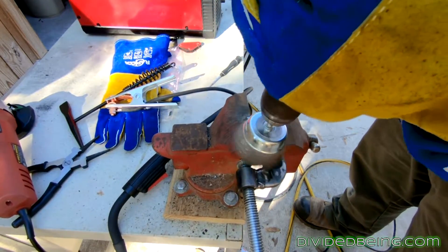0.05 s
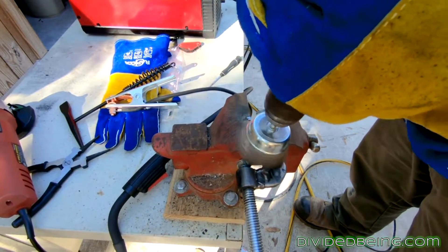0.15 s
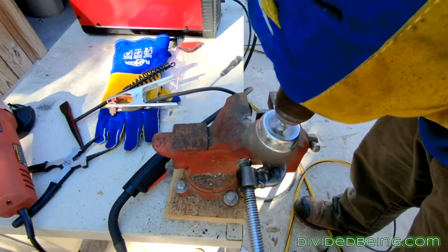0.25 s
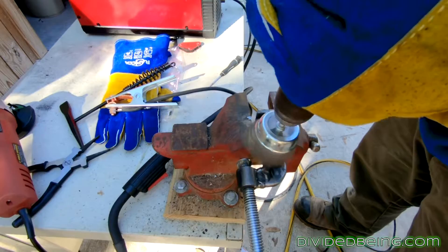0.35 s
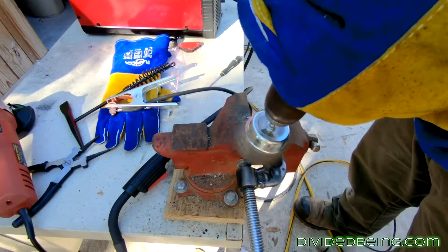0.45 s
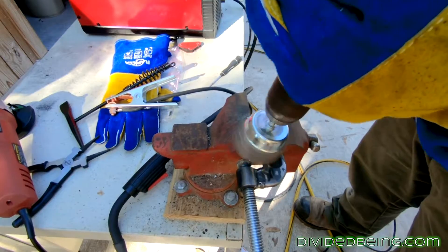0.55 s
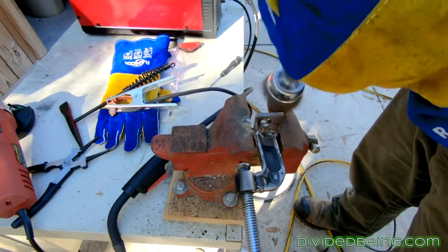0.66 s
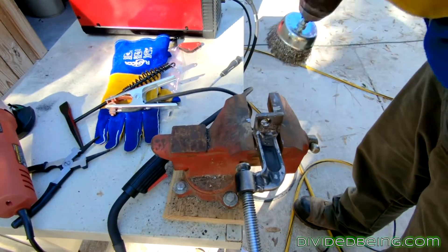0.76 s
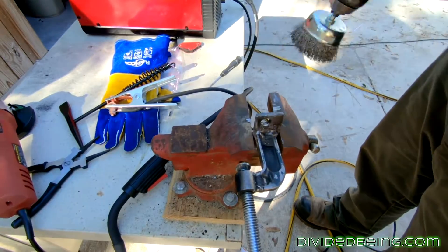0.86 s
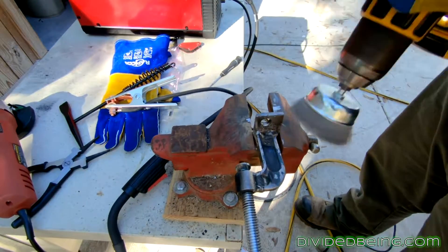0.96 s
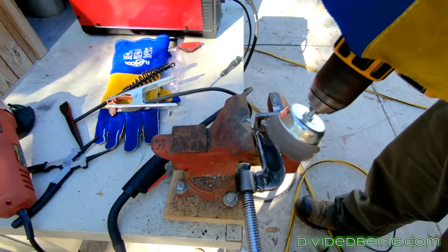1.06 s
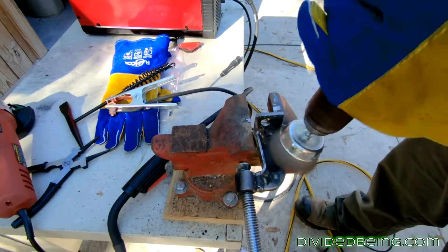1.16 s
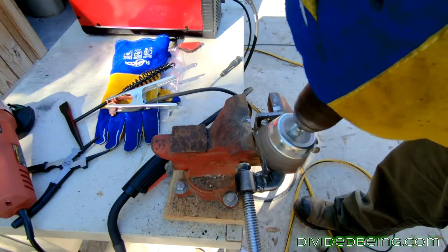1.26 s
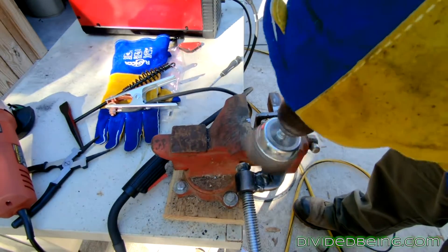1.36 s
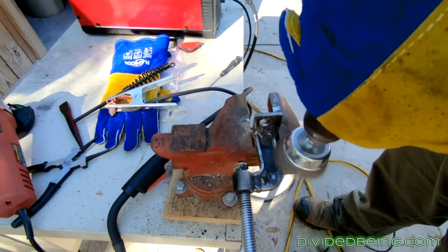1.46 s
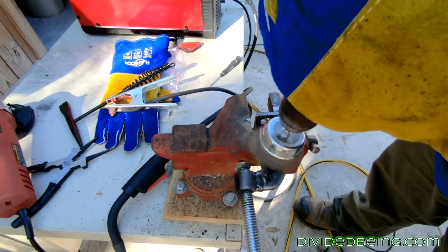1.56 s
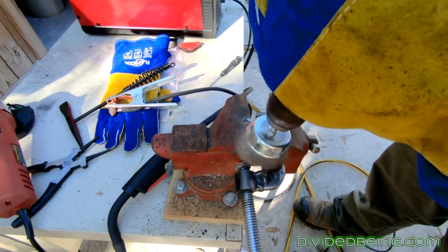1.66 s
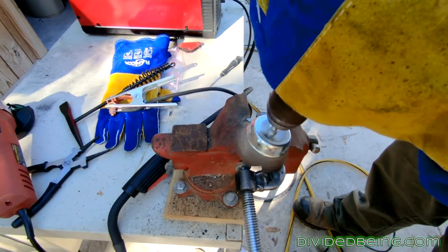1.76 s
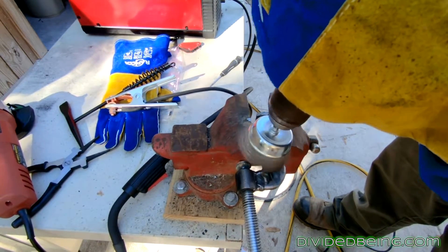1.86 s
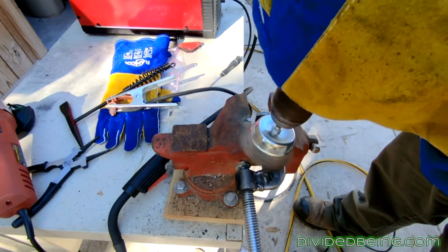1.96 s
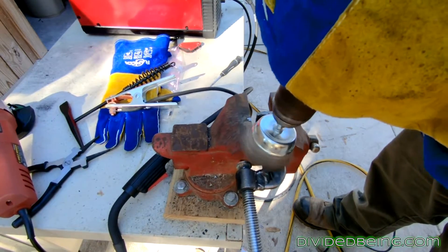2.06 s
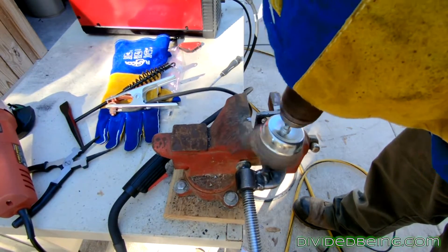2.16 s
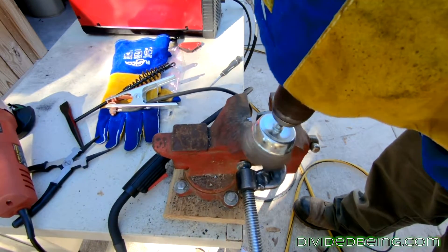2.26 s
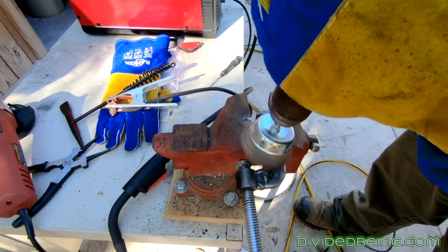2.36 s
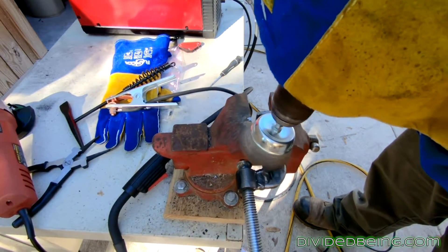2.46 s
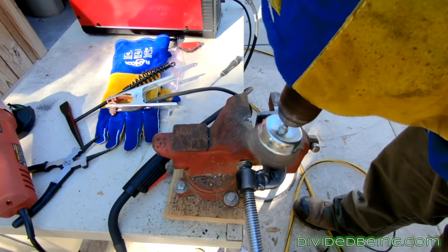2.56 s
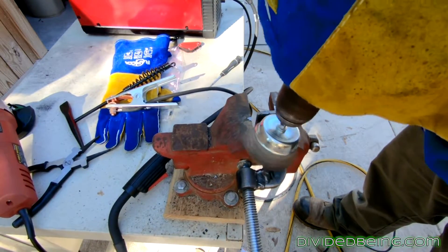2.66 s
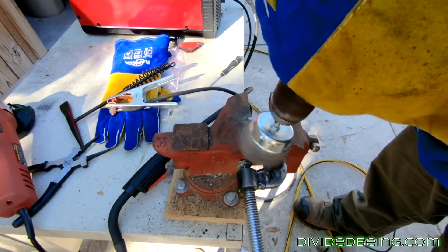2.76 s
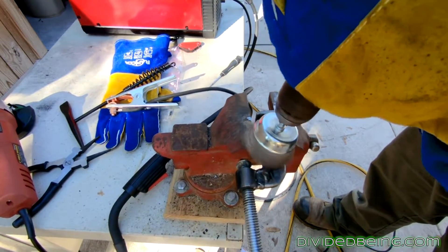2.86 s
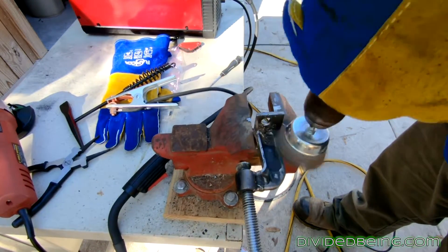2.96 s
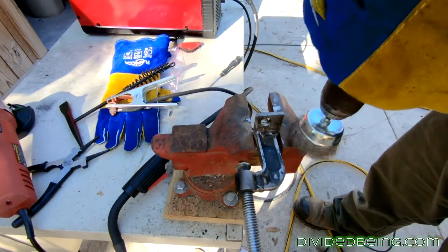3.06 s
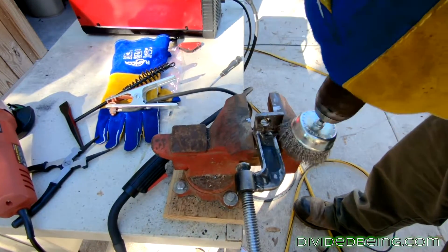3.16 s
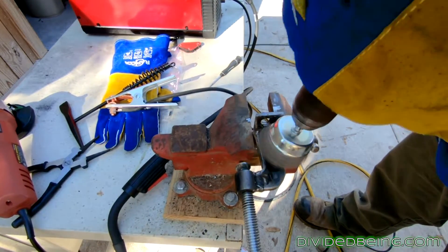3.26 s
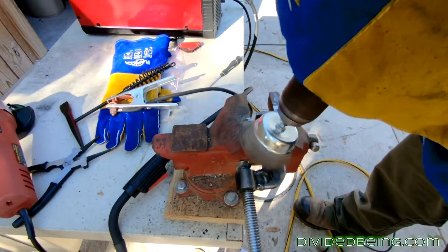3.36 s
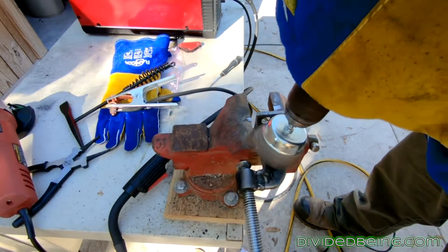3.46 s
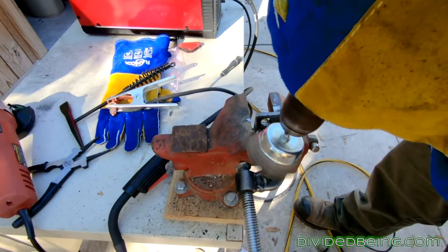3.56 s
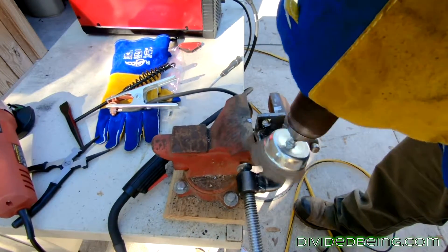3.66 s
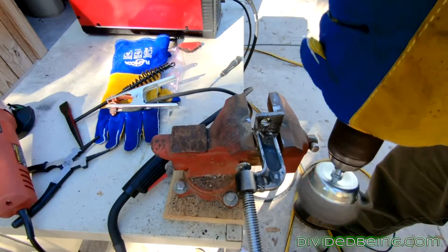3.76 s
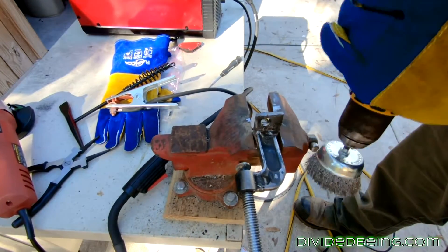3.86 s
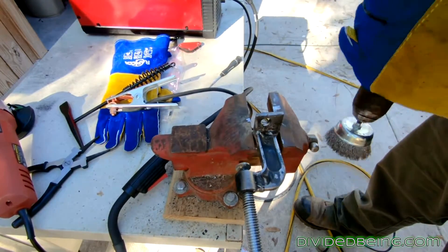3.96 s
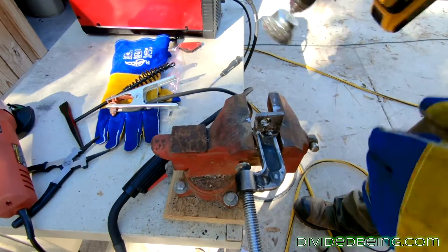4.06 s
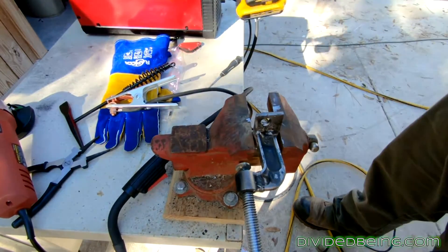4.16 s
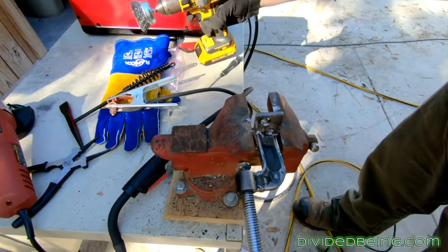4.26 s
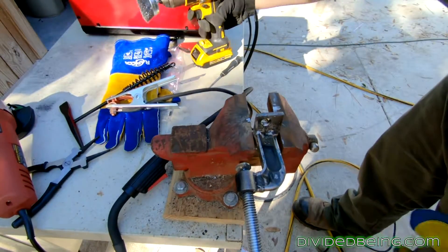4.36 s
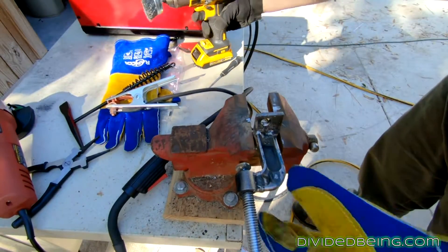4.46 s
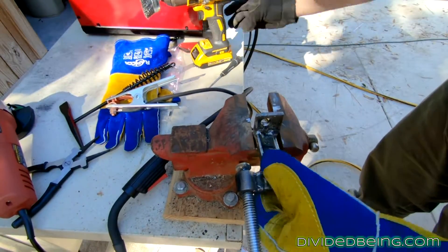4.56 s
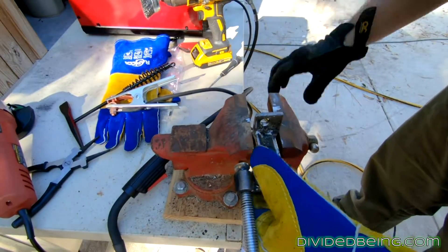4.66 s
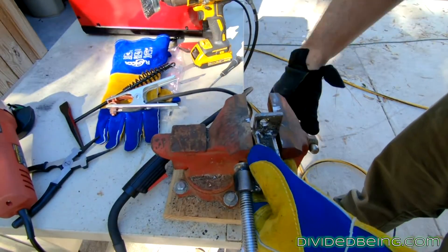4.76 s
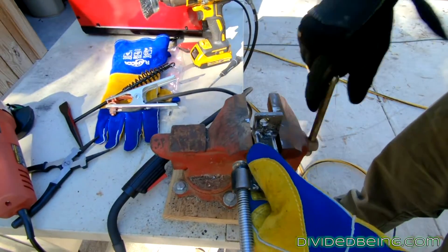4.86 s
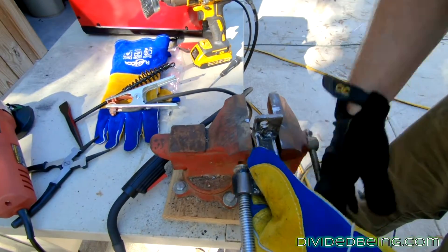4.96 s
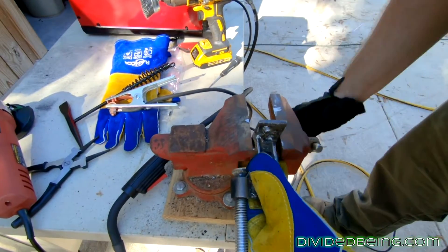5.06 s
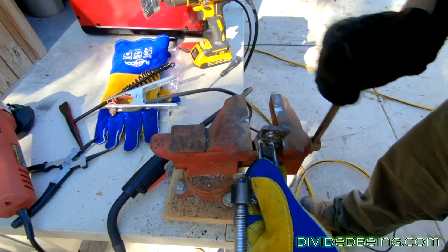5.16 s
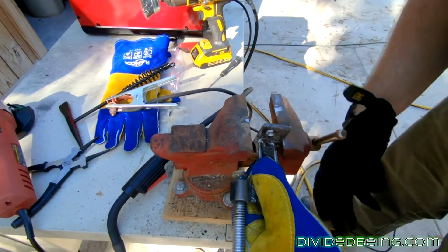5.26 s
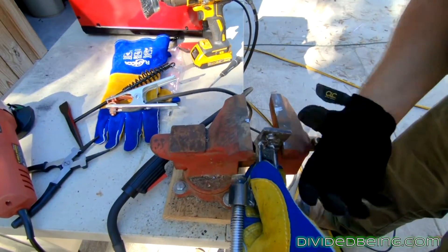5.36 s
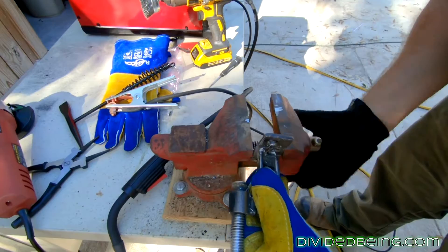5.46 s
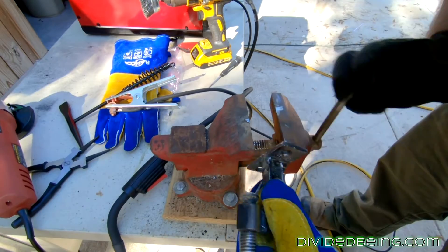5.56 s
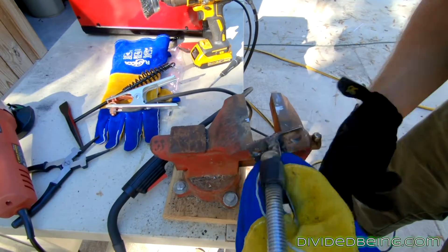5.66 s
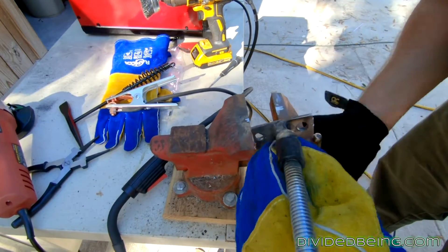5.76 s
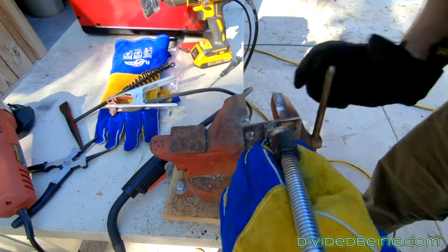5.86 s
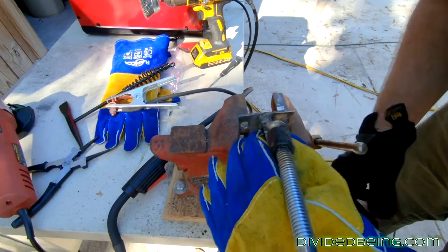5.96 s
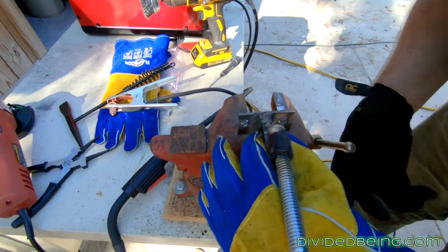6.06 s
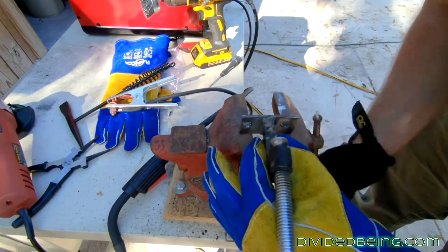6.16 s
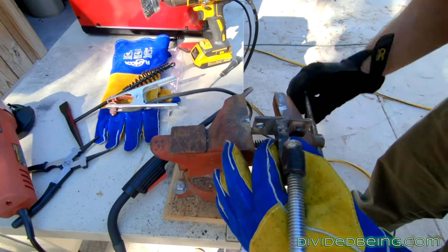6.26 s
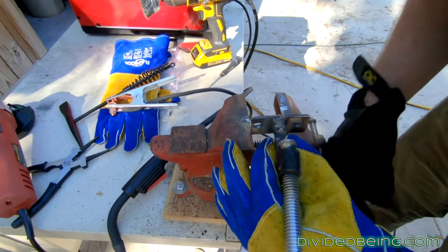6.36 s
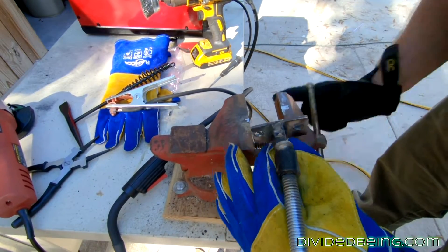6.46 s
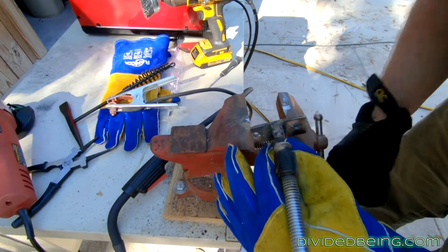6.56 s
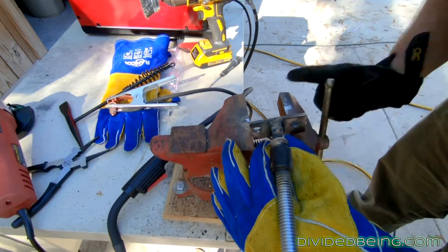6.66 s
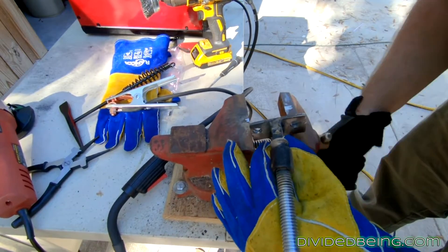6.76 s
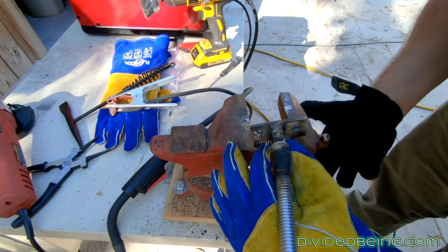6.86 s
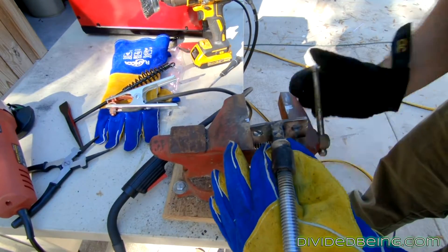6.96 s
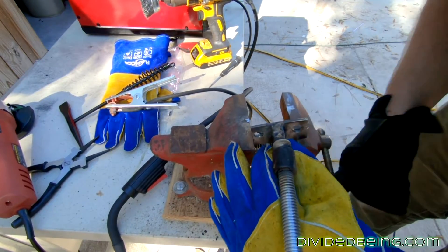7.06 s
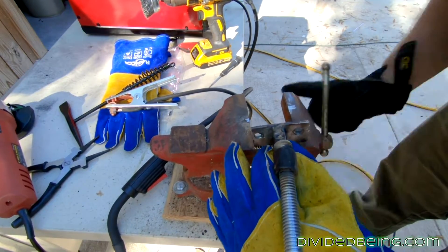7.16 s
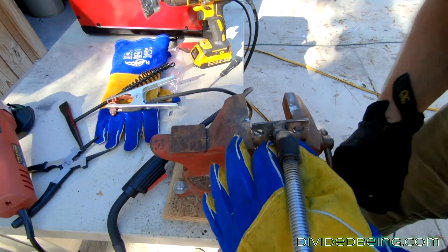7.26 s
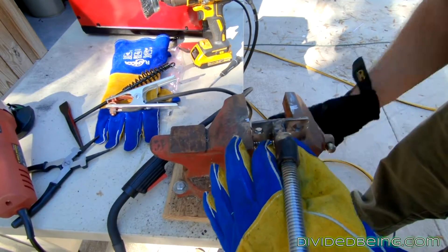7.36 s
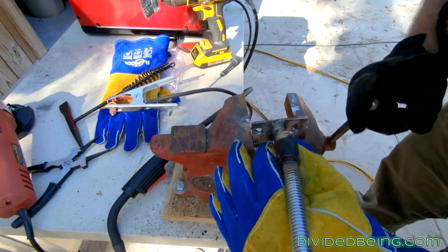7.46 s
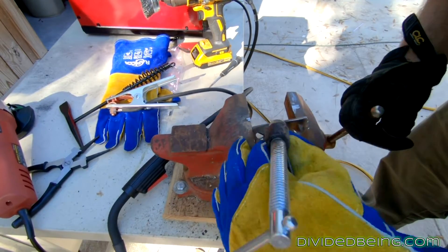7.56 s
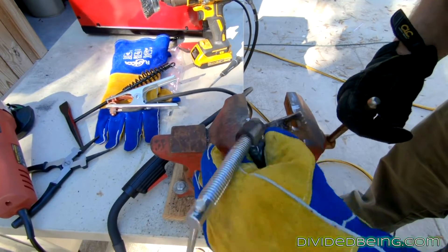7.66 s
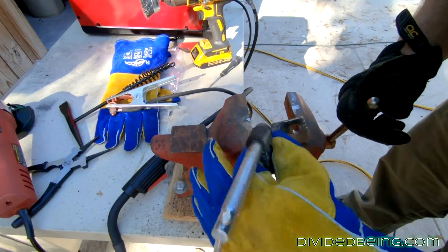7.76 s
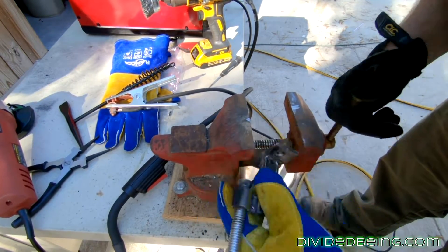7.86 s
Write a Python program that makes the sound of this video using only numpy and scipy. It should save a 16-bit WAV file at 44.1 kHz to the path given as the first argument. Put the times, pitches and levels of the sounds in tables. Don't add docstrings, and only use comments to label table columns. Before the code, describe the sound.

Outdoors in a quiet yard, heard close on a small, mostly mono microphone. From 0 s a cordless drill is already running, a gear whine near 870 Hz with airy whistle and bright wire-brush hiss on steel; it snags with a knock at 0.63 and stops at 0.71 in a fast triple clack. A trigger snap at 0.9 starts a higher whine, about 1 kHz, that bites at 1.4 and sags under a long throbbing scrub until braking at 3.04. A third shorter run from 3.16 slows, with hard vice knocks around 3.4 to 3.65, ending at 3.77. A brief lull, then the drill clatters down at 4.3 to 4.6, with a heavy metal knock at 4.84. From 5 to 7.9 s gloved hands work the vice: clinks, rattles, bright ticks at 5.33 and 5.66, small squeaks, leather rustle. A faint far engine revs up from 6.8.

```python
import sys
import numpy as np
from scipy import signal
from scipy.fft import rfft, irfft, next_fast_len
from scipy.io import wavfile
from scipy.ndimage import uniform_filter1d, map_coordinates

SR = 44100
rng = np.random.default_rng(int(sys.argv[2]) if len(sys.argv) > 2 else 0)


def unload_audio(sound):
    columns = np.transpose(np.atleast_2d(sound))
    steps = np.round(np.clip(columns, -1, 1) * 32767)
    wavfile.write(sys.argv[1], SR, steps.astype(np.int16))


def boost_factor(decibels):
    exponent = np.asarray(decibels, float) / 20
    return 10 ** exponent


N = 348831


def unit(x):
    return x / np.sqrt(np.mean(x ** 2) + 1e-20)


def curves(rows):
    s, *cols = np.transpose(rows)
    return [np.interp(np.arange(N) / SR, s, c) for c in cols]


def bursts(tables):
    def quiet(row, step_s):
        return [row[0] + step_s] + [v if v > 0 else -110 for v in row[1:]]

    rows = []
    for burst in tables:
        rows += [quiet(burst[0], -.003), *burst, quiet(burst[-1], .003)]
    return curves(rows)


def wobble(rate):
    at = np.arange(0, N + 8, 8)
    knots = rng.standard_normal(int(N * rate / SR) + 4)
    return np.interp(np.arange(N), at, map_coordinates(knots, [at * rate / SR]))


def filtered(x, response):
    m = next_fast_len(N + SR // 2)
    return irfft(rfft(x, m) * response(np.fft.rfftfreq(m, 1 / SR)), m)[:N]


def bandpassed(x, lo_hz, hi_hz):
    return signal.sosfilt(signal.butter(2, [lo_hz, hi_hz], "band", fs=SR, output="sos"), x[:N])


def coloured(x, points):
    f, db = np.transpose(points)
    return unit(filtered(x, lambda hz: boost_factor(np.interp(np.log(hz + 1), np.log(f), db))))


def grit(spiky_db, rate):
    return rng.standard_normal(N) * boost_factor(spiky_db * np.clip(wobble(rate), -3, 2.2))


def patchy(x, patch_db):
    z = signal.stft(x, nperseg=512)[2]
    field = rng.standard_normal(z.shape)
    for axis in (0, 1):
        field = uniform_filter1d(field, size=9, axis=axis)
    return signal.istft(z * boost_factor(patch_db * unit(field)), nperseg=512)[1][:N]


def fade(t, t60, rise_s):
    return boost_factor(-60 * t / np.clip(t60, .002, .6)) * (1 - np.exp(-t / rise_s))


def modes(table):
    def response(f):
        total = 0
        for k, (c, w, db) in enumerate(table):
            total = total + (-1) ** k * boost_factor(db) * 1j * f * w / (c * c - f * f + 1j * f * w)
        return total / (1 + (0.95 * table[0][0] / (f + 1)) ** 6)
    return response


# mode in Hz, width in Hz, level in dB.
VICE_MODES = [(406.2, 41.5, 1), (466.2, 17.8, 3), (524.5, 61, -0.5), (802, 87, -0.5), (914, 50.5, 3.5),
              (1162, 78, -2), (1450, 164, -10), (1940, 224, -17.5), (2700, 520, -26.5)]


def vice(x, tilt_db):
    whole = filtered(x * boost_factor(tilt_db), modes(VICE_MODES))
    return whole + filtered(x * (boost_factor(-tilt_db) - boost_factor(tilt_db)), modes(VICE_MODES[:3]))


GRIP_FROM_S, GRIP_TO_S, GRIP_ABOVE_HZ, GRIP_DB = 5.85, 7.51, 1800, -6


def gripped(x):
    t = np.arange(N) / SR
    dull = filtered(x, lambda hz: boost_factor(GRIP_DB / (1 + (GRIP_ABOVE_HZ / (hz + 1)) ** 8)))
    return np.where((t > GRIP_FROM_S) & (t < GRIP_TO_S), dull, x)


# frequency in Hz, density in dB per Hz.
AIR_COLOUR = [(30, -9), (100, -11), (140, 1), (245, -17), (450, 7), (900, -5.5), (1500, -3.5), (2200, -11),
              (5000, -8.5), (8000, -17), (15500, -51)]
AIR_DB = -62.5
# time in seconds, firing rate in Hz, level in dB.
ENGINE_RUN = [(0, 55, -94), (6.75, 55.2, -63.5), (6.85, 60.2, -68), (7.2, 70, -75.5), (7.6, 80, -74),
              (7.91, 83.6, -71)]


def yard():
    hz, db = curves(ENGINE_RUN)
    fire = 2 * np.pi * np.cumsum(hz) / SR
    engine = boost_factor(-.5 + 2.5 * wobble(14)) * np.sin(2 * fire)
    engine += boost_factor(-1.5 + 2.5 * wobble(10)) * np.sin(3 * fire)
    air = coloured(patchy(rng.standard_normal(N), patch_db=1.6), AIR_COLOUR)
    return boost_factor(AIR_DB) * air + boost_factor(db) * engine


# time in seconds, gear whine in Hz, level in dB.
WHINE_RUNS = [
    [(0, 866, -29), (.56, 874, -31), (.61, 882, -33), (.635, 945, -31), (.71, 945, -34)],
    [(1.04, 996, -25), (1.27, 996, -23), (1.33, 975, -26), (1.58, 988, -25), (1.7, 941, -28),
     (1.95, 916, -28), (2.13, 930, -28), (2.92, 900, -27), (3.04, 820, -31)],
    [(3.32, 966, -25), (3.4, 925, -27), (3.49, 923, -27), (3.55, 850, -28), (3.6, 800, -27),
     (3.66, 840, -26), (3.72, 810, -29), (3.77, 780, -31)],
]
# on in seconds, let go in seconds, spin-up in seconds, gap of brake clacks in seconds.
TRIGGER_PULLS = [
    (-1, .7138, .04, .0112),
    (.901, 3.042, .039, .0117),
    (3.164, 3.7668, .058, .0133),
]
# gear noise in dB, vent air in dB, brake clack in dB.
PULL_LEVELS = [
    (-31.5, -34, -14),
    (-30, -33, -10.5),
    (-29, -42, -12.5),
]
# time in seconds, level in dB.
NEARNESS = [(0, 0), (.74, -0.6), (.96, -3), (1.91, -0.45), (2.91, -0.4), (3.03, -6), (3.25, .1), (3.79, -5)]
REST_SHARE, BRAKE_SAG_PER_S = .42, 17
STALL_S, STALL_HALF_S, STALL_SHARE = 1.432, .042, .05
SPIN_UP_DB = (30, 15.4, 13, 9.8)
# loss in dB per second, the whine from letting go, the rest once stopped.
STOP_DB_PER_S = (750, 1200, 900, 850)
HISS_DB, VENT_FOLLOWS = -24.5, 0.72


def motor():
    t = np.arange(N) / SR
    hz, whine_db = curves(sum(WHINE_RUNS, []))
    near_db, = curves(NEARNESS)
    pull = np.clip(np.searchsorted([row[0] for row in TRIGGER_PULLS], t) - 1, 0, None)
    on, off, spin_s, gap_s = np.transpose(TRIGGER_PULLS)[:, pull]
    gear_db, vent_db, _ = np.transpose(PULL_LEVELS)[:, pull]
    spin = 1 - (1 - REST_SHARE) * np.exp(-((t - on) / spin_s) ** 3)
    spin -= STALL_SHARE * np.exp(-((t - STALL_S) / STALL_HALF_S) ** 4)
    braking = np.clip(t - off, 0, None)
    standing = np.clip(t - off - 2.5 * gap_s, 0, None)
    full = [whine_db, gear_db, vent_db + VENT_FOLLOWS * near_db, HISS_DB + near_db]
    late = [braking, standing, standing, standing]
    levels = [db + up * (spin - 1) - down * late_s
              for db, up, down, late_s in zip(full, SPIN_UP_DB, STOP_DB_PER_S, late)]
    return hz * spin * np.clip(1 - BRAKE_SAG_PER_S * braking, .3, 1), *levels, braking > 0


TEETH_PER_TURN = 24.55


def full_speed(hz):
    return np.clip(hz / 850, 0, 1) ** 6


def beat(turn, depth_db):
    return boost_factor(depth_db * np.cos(2 * turn + 0.48 * wobble(8.2)) + 0.091 * depth_db * np.cos(4 * turn))


def riding_band(mesh, times, width_hz):
    phase = np.cumsum(times * np.gradient(mesh))
    return unit(np.real((wobble(width_hz) + 1j * wobble(width_hz)) * np.exp(1j * phase)))


# multiple of the whine, level in dB.
TOOTH_TONES = [(1, 1.5), (8, -15)]


def gear_whine(mesh, fast):
    whine = 0
    for k, db in TOOTH_TONES:
        tone = np.sin(k * mesh + 0.2 * k * wobble(90))
        whine = whine + fast ** (k > 1) * boost_factor(db + 1.1 * wobble(25.18)) * tone
    return whine


# multiple of brush turns, level in dB.
SHAFT_TONES = [(2, -2), (3, -13), (4, -3.5), (6, -17)]


def shaft_shake(turn):
    return sum(boost_factor(db + 1.02 * k * wobble(27.04)) * np.sin(k * turn + 0.42 * k * wobble(17))
               for k, db in SHAFT_TONES)


# bench mode in Hz, width in Hz, level in dB.
BENCH_MODES = [(44.8, 22, -26.5), (111, 37, -13), (232, 46, -5.5), (319.8, 23, -3)]


def contact_rumble(turn):
    body = modes(BENCH_MODES + VICE_MODES)
    push = grit(spiky_db=0.5, rate=52) * beat(turn, 5.5)
    return unit(filtered(push, lambda f: body(f) * boost_factor(-.012 * f) + 0.0083))


# frequency in Hz, density in dB per Hz.
GEAR_COLOUR = [(500, -28.5), (700, -13), (1000, -5.5), (1450, -1.5), (2100, -6), (2800, -7), (3400, -16),
               (4000, -40)]


def gear_noise(turn):
    return coloured(patchy(grit(spiky_db=2.0, rate=500), patch_db=2.2) * beat(turn, 2.8), GEAR_COLOUR)


# frequency in Hz, density in dB per Hz.
VENT_COLOUR = [(2600, -30), (3200, -2.5), (4100, -3.5), (5100, -4.5), (5800, -25)]
# time in seconds, level in dB, multiple of the whine.
VENTS_FACING = [(0, -39, 3.78), (.62, -34, 3.78), (.7, -55, 3.78), (.95, -32, 3.6), (1.2, -34, 3.7),
                (1.27, -36, 3.9), (1.3, -29.5, 4), (1.35, -33, 3.8), (1.39, -29.5, 3.6), (1.46, -39, 3.8),
                (1.62, -38, 3.9), (1.68, -33, 4.15), (1.95, -46, 4.1)]


def vent_air(mesh, turn, fast, vent_db):
    facing_db, times = curves(VENTS_FACING)
    rush = coloured(patchy(rng.standard_normal(N), patch_db=0.5), VENT_COLOUR)
    pitched = boost_factor(facing_db) * (vent_db > -60) * fast * riding_band(mesh, times, width_hz=750)
    return (boost_factor(vent_db + 1.5) * rush + pitched) * beat(turn, 3.8) * boost_factor(1.18 * wobble(40.02))


# frequency in Hz, density in dB per Hz.
WIRE_COLOUR = [(4700, -33), (5400, -4.5), (6500, -1), (8400, -7), (10000, -6.5), (12000, -12.5),
               (14000, -14.5), (15500, -20)]


def wire_hiss(mesh, turn, fast):
    scrape = patchy(grit(spiky_db=1.0, rate=540), patch_db=2.0) * beat(turn, 1.77)
    riding = fast * riding_band(mesh, times=7.6, width_hz=1400) * beat(turn, 3.1)
    return unit(coloured(scrape, WIRE_COLOUR) + boost_factor(-5.5) * riding)


# time in seconds, steady pressure in dB, chatter in dB.
BRUSH_CONTACT = [
    [(0.0, -39, -35), (0.612, -39.5, -32.5), (0.642, -47, -22), (0.69, -57, -35), (0.79, -99, -69)],
    [(0.9, -93, -54), (1.24, -48, -37), (1.34, -62, -42), (1.4, -39, -28.5), (1.56, -54, -38.5),
     (1.96, -38, -31), (2.35, -36, -36), (2.87, -34, -31.5), (2.96, -33, -27.5), (3.11, -81, -49)],
    [(3.164, -80, -45), (3.346, -36, -32.5), (3.65, -46, -22.5), (3.78, -68, -33), (3.86, -92, -61)],
]
ROCK_HZ, ROCK_SWING, ROCK_UNTIL_S = 7.8, 0.0139, .62


def drill():
    hz, whine_db, gear_db, vent_db, hiss_db, released = motor()
    shake_db, rumble_db = bursts(BRUSH_CONTACT)
    t = np.arange(N) / SR
    rocking = ROCK_SWING * np.cos(2 * np.pi * ROCK_HZ * (t - .33)) * (t < ROCK_UNTIL_S)
    mesh = 2 * np.pi * np.cumsum(hz * (1 + 0.003045 * wobble(30) + rocking)) / SR
    turn, fast = mesh / TEETH_PER_TURN, full_speed(hz)
    tones = boost_factor(whine_db - 1.5) * gear_whine(mesh, fast) + boost_factor(shake_db) * shaft_shake(turn)
    noises = boost_factor(gear_db) * gear_noise(turn) + vent_air(mesh, turn, fast, vent_db)
    noises += boost_factor(hiss_db) * wire_hiss(mesh, turn, fast)
    return np.sqrt(2) * tones + boost_factor(rumble_db) * contact_rumble(turn) + boost_factor(-7 * released) * noises


BLADE_TIMES, BLADE_WIDTH_HZ, BLADE_DB = 7.95, 420, -14.5
REED_TIMES, REED_WIDTH_HZ, REED_DB, REED_UNTIL_S = 3.79, 300, -37.5, .66


def fan():
    hz, _, _, _, hiss_db, released = motor()
    mesh, t = 2 * np.pi * np.cumsum(hz) / SR, np.arange(N) / SR
    flare = boost_factor(2.5 * np.cos(2 * mesh / TEETH_PER_TURN) + 4 * wobble(14)) * full_speed(hz) * ~released
    blades = boost_factor(hiss_db + BLADE_DB) * riding_band(mesh, BLADE_TIMES, BLADE_WIDTH_HZ)
    reed = boost_factor(REED_DB + 1.5 * wobble(9)) * (t < REED_UNTIL_S)
    return flare * (blades + reed * riding_band(mesh, REED_TIMES, REED_WIDTH_HZ))


# time in seconds, peak in dB, click in dB, thump in dB.
HARD_BLOWS = [(0.629, -18.5, -10, -14), (.622, -24, 0, -32), (2.603, -19, -30, -16),
              (2.93, -17.5, -15, -12), (2.982, -18, -20, -15), (3.41, -14.5, -20, -15),
              (3.438, -16, -15, -14), (3.54, -15, -20, -19), (3.624, -10.5, -21, -18),
              (4.196, -42, -13, -13), (4.838, -9, -16, -18), (4.405, -14.5, -18, -17),
              (4.44, -17.5, -12.5, -29), (.9068, -27, -39, -39), (.737, -38, -39, -35),
              (3.066, -36, -39, -35), (3.794, -33, -39, -35), (1.386, -18.5, -9, -29),
              (2.905, -16.5, -30, -11), (2.955, -13, -30, -16), (3.397, -15, -38, -12),
              (3.597, -10, -22, -14), (3.655, -12, -33, -29), (4.279, -37, -6, -21),
              (4.295, -7, -10.5, -19.5), (4.318, -15, -39, -16), (4.361, -6, -16, -21),
              (4.388, -12, -11.5, -17), (4.428, -18, -8, -26), (4.501, -30, -12, -39),
              (4.548, -33, -4, -34), (4.595, -28, 3, -52), (4.756, -44, -28, -25), (4.793, -36, -21, -22),
              (4.812, -28, -8, -22), (4.826, -6, -8, -16.5), (4.849, -8, -17, -22), (4.875, -15, -23, -25)]
# low modes, upper
# modes, click in dB.
HAND_TOUCHES = [(4.972, -29.5, -6, -11.5, -19), (5.137, -30.5, -14, -3, -28), (5.177, -29, -14, -7, -28),
                (5.304, -34, -11, -5, -18), (5.333, -16, -8, -9, -10.5), (5.455, -25.5, -18, -7, -19),
                (5.496, -21.5, -13, -4, -19), (5.525, -14.5, -20, -4, -24), (5.548, -27, -10, -5, -5),
                (5.577, -22.5, -8, -9, -20), (5.664, -22, -7, -9, -10), (5.674, -15, -5, -11, -21),
                (5.709, -26, -9, -8, -16), (5.756, -30, -9, -12, -23), (5.781, -28, -11, -7, -14),
                (5.86, -26, -12, -7, -20), (5.896, -28.5, -10, -10, -33), (5.96, -35.5, -7, -11, -31),
                (6.029, -33.5, -6, -9, -16), (6.071, -32, -6, -10, -30), (6.123, -37.5, -14, -4, -10),
                (6.138, -33, -14, -7, -25), (6.215, -27.5, -6, -9, -27), (6.233, -23.5, -14, -4, -27),
                (6.278, -30.5, -18, -7, -18), (6.317, -33.5, -15, -3, -25), (6.384, -27, -17, -3, -27),
                (6.423, -24.5, -12, -4, -31),
                (6.482, -19, -16, -8, -8), (6.562, -31, -9, -4, -20), (6.588, -24.5, -15, -6, -22),
                   (6.609, -31.5, -14, -7, -25), (6.655, -28.5, -10, -8, -27), (6.706, -31, -10, -6, -29),
                   (6.761, -30.5, -3, -3, -7), (6.797, -17, -11.5, -8.5, -22), (6.907, -30, -8, -10.5, -21),
                   (7.013, -39.5, -10, -10, -13), (7.103, -32, -12, -5, -28), (7.126, -26.5, -9, -9.5, -25),
                   (7.163, -31.5, -11, -10, -26), (7.194, -40, -13, -4, -24), (7.243, -38, -11, -5, -21),
                   (7.268, -29.5, -13, -8, -18), (7.332, -25.5, -9, -9, -34), (7.399, -38, -12, -6, -19),
                   (7.474, -41.5, -11, -9, -14), (7.526, -26, -11, -7, -19), (7.549, -32, 0, -3, -21),
                   (7.582, -18, -9.5, -8, -27), (7.607, -30, -13, -7, -31), (7.664, -28, -18, -5, -28),
                   (7.679, -33.5, -12, -5, -19), (7.735, -16.5, -10.5, -7, -15.5),
                   (7.757, -22, -13, -5, -19), (7.814, -25.5, -12, -5, -16), (7.834, -29, -9, -7, -23),
                   (7.888, -34, -4, -14, -18)]
LANDING_FROM_S, LANDING_TO_S, LANDING_TILT_DB = 4.27, 4.63, 2.9
THUMP_DB, CLAMP_DB_PER_S = -20, -6.5
UPPER_LEAD_DB, CLICK_LIFT_DB = 3, 6
BARE_FRONT, BARE_T60_S = 7.3, 0.19
GLOVED_FRONT, GLOVED_T60_S = 3.5, .13


def knocks():
    ring, click, thump = np.zeros((3, N + SR))
    t = np.arange(SR // 5) / SR
    impulse = np.arange(N) == 0
    low = filtered(impulse, modes(VICE_MODES[:3]))[:len(t)]
    whole = filtered(impulse, modes(VICE_MODES))[:len(t)]
    events = []
    for s, db, click_db, thump_db in HARD_BLOWS:
        tilt_db = LANDING_TILT_DB * (LANDING_FROM_S < s < LANDING_TO_S)
        events.append((s, db + 2.5, tilt_db, click_db - 1.5, thump_db - 2.5, BARE_FRONT, BARE_T60_S))
    for s, db, low_db, upper_db, click_db in HAND_TOUCHES:
        tilt_db = np.clip((upper_db - low_db - UPPER_LEAD_DB) / 2, -6, 6)
        click_db = min(click_db + CLICK_LIFT_DB, -3)
        thump_db = THUMP_DB + CLAMP_DB_PER_S * (s - 5.5)
        events.append((s, db, tilt_db, click_db, thump_db, GLOVED_FRONT, GLOVED_T60_S))
    for s, db, tilt_db, click_db, thump_db, front, t60 in events:
        at = slice(round(s * SR), round(s * SR) + len(t))
        noise = rng.standard_normal((3, len(t)))
        hard = front * boost_factor(.5 * (db + 7))
        push = fade(t, t60, .005) * noise[0] + hard * fade(t, .0025, .00012)
        tilted = boost_factor(tilt_db) * whole + (boost_factor(-tilt_db) - boost_factor(tilt_db)) * low
        body = signal.fftconvolve(push, tilted)[:len(t)]
        ring[at] += boost_factor(db) * body / np.abs(body).max()
        snap = fade(t, 0.022, 0.00066) + 0.72 * fade(t, 0.63 * t60, 0.0023)
        click[at] += boost_factor(db + click_db - 2.0) * snap * noise[1]
        thump[at] += boost_factor(db + thump_db + 30.0) * fade(t, 0.81 * t60, 0.0014) * noise[2]
    ring = gripped(bandpassed(bandpassed(ring, 230, 9000), 200, 12000))
    return ring + bandpassed(click, 1400, 7570) + filtered(thump[:N], modes(BENCH_MODES))


# time in seconds, pitch in Hz, level in dB,
# t60 in seconds.
RINGS_AND_SQUEAKS = [(.633, 427, -17, .05), (.656, 560, -25, 0.093), (.645, 303, -26, .1), (.66, 900, -25, .08),
                     (3.2, 420, -29, 0.07), (3.6, 590, -25, .1), (3.628, 520, -26.5, 0.11),
                     (4.5, 520, -39.5, 0.42), (4.665, 4340, -63, .5), (4.68, 2000, -71, .6),
                     (4.78, 4350, -63, .3), (4.755, 450, -46, .1), (4.85, 330, -19.5, .2),
                     (4.39, 220, -24, 0.19), (5.345, 470, -31, 0.11), (7.592, 3700, -51, .03),
                     (4.325, 478, -25, .6), (4.44, 495, -31.5, 0.31), (4.6, 490, -42, 0.23),
                     (4.367, 3650, -38, .03), (4.304, 800, -19, .09), (4.37, 830, -19, .07),
                     (4.371, 1060, -19, .07), (4.3, 1000, -24, 0.31), (4.845, 925, -22, 0.22),
                     (4.8, 7700, -43, 0.2), (4.89, 14000, -35, .073), (5.335, 14100, -30, .11),
                     (5.335, 10300, -28.5, .05), (5.567, 7830, -32, .052), (5.668, 14100, -31, 0.11),
                     (5.663, 16000, -28, .043), (6.34, 3780, -42, 0.1), (6.34, 7600, -52, .06),
                     (6.785, 13800, -43, .088), (7.74, 7800, -42, .13), (6.8, 7800, -44, .05),
                     (7.814, 6000, -42, .043), (7.735, 3870, -42, 0.026),
                     (4.299, 1900, -30, .07), (4.299, 2480, -35, .09), (4.299, 1260, -28, .08),
              (4.366, 1890, -31, .06), (4.395, 2480, -42, .2), (4.37, 1260, -28, .15),
              (4.83, 2010, -30, .14), (4.832, 2620, -31, .08), (4.83, 3380, -36, .1),
              (4.976, 520, -36, .04), (5.15, 1550, -48, .2), (5.3, 1550, -49, .15), (5.46, 2050, -50, .12),
              (5.497, 2000, -40, .1), (5.52, 1550, -40, .1), (5.549, 4300, -44, .03),
              (5.575, 3700, -45, .03), (6.04, 5150, -58, .15), (6.322, 3850, -53, .15),
              (6.49, 3800, -43, .04), (6.8, 110, -50, .1), (6.8, 205, -46, .08), (3.81, 450, -42, .35)]
SWELL_S = 0.0072


def squeaks():
    out, t = np.zeros(N), np.arange(N) / SR
    for s, hz, db, t60 in RINGS_AND_SQUEAKS:
        near = slice(round((s - .1) * SR), round((s + .5) * SR))
        u = t[near] - s
        knots = rng.standard_normal((2, 800))
        real, imag = [map_coordinates(k, [(u + .1) * .08 * hz]) for k in knots]
        swell = np.where(u < 0, np.exp(-(u / SWELL_S) ** 2), boost_factor(-60 * np.abs(u) / t60))
        out[near] += boost_factor(db) * swell * np.real((.7 + real + 1j * imag) * np.exp(2j * np.pi * hz * u))
    return out


# mode in Hz, width in Hz, level in dB.
CASE_MODES = [(1290, 390, -3), (2220, 1200, -2), (3840, 900, -8), (6400, 1800, -10), (10300, 3900, -18),
              (3050, 300, -6)]
CLACK_DB = (-2, .1, -1)
# time in seconds, peak in dB.
TRIGGER_SNAPS = [
    (.9073, -15.5),
    (3.1684, -17),
]
SLACK_S, SLACK_DB = 0.0037, -10


def brake():
    blows, t = np.zeros(N), np.arange(SR // 12) / SR
    events = [(s, db) for s, db in TRIGGER_SNAPS]
    events += [(s - SLACK_S, db + SLACK_DB) for s, db in TRIGGER_SNAPS]
    for (_, off, _, gap_s), (_, _, loud_db) in zip(TRIGGER_PULLS, PULL_LEVELS):
        events += [(off + k * gap_s, loud_db + db) for k, db in enumerate(CLACK_DB)]
    for s, db in events:
        shape = boost_factor(-60 * t / 0.012) + 0.086 * boost_factor(-60 * t / 0.07)
        hit = rng.standard_normal(len(t)) + 6 * (t == 0)
        blows[round(s * SR):][:len(t)] += boost_factor(db - 8.5) * unit(shape * hit)
    return filtered(blows, modes(CASE_MODES))


# time in seconds, rattle in dB.
HAND_EFFORT = [(3.95, -85), (4.1, -65), (4.17, -48), (4.23, -59), (4.46, -52), (4.7, -74), (4.97, -40),
               (5.09, -48), (5.17, -40), (5.27, -44.5), (5.33, -42), (5.41, -46), (5.49, -35), (5.62, -44),
               (5.68, -39), (5.91, -47), (6.56, -40.5), (7.12, -48), (7.59, -45.5), (7.73, -35.5),
               (7.91, -44)]
# time in seconds, half length in seconds,
# swish in dB, rustle in dB.
GLOVE_STROKES = [(4.17, 0.06, -49.5, -56), (3.98, .05, -63, -74), (4.301, 0.022, -39, -54),
                 (4.434, 0.015, -35, -44), (.9, .014, -53, -49), (.77, 0.027, -58, -57),
                 (.83, .05, -75, -71), (3.91, .004, -68, -68), (5.33, .012, -46, -46),
                 (6.762, 0.0094, -53, -52), (4.859, 0.048, -40.5, -47), (5.21, 0.17, -59, -75),
                 (5.77, 0.076, -52, -59), (4.999, 0.082, -49.5, -58), (5.174, 0.026, -75, -84),
                 (5.496, 0.054, -64, -73), (5.66, 0.021, -49, -44), (6.05, 0.017, -55, -62),
                 (6.248, 0.023, -67, -70), (6.582, 0.07, -51, -57), (6.79, 0.011, -40, -49),
                 (7.45, 0.099, -57.5, -63)]
# frequency in Hz, density in dB per Hz.
SWISH_COLOUR = [(1000, -30), (1500, -2), (2500, -3), (3900, 0), (5000, -5), (6500, -20)]
# frequency in Hz, density in dB per Hz.
RUSTLE_COLOUR = [(4500, -24), (6000, 1), (8000, 2), (10000, -2.5), (12000, -0.5), (15500, -19)]
SWISH_DB, RUSTLE_DB, GLOVES_FOLLOW = -70, -62.5, 0.42
TILT_DB = 4


def hands():
    rattle_db, = curves([(3.8, -110), *HAND_EFFORT])
    glove_db = GLOVES_FOLLOW * (rattle_db + 44.5)
    t = np.arange(N) / SR
    lumps = 1.04 * np.tanh(wobble(28))
    swish_gain, rustle_gain = boost_factor(SWISH_DB + glove_db), boost_factor(RUSTLE_DB + glove_db)
    for s, half_s, swish_db, rustle_db in GLOVE_STROKES:
        stroke = np.exp(-((t - s) / half_s) ** 4)
        swish_gain = swish_gain + boost_factor(swish_db) * stroke
        rustle_gain = rustle_gain + boost_factor(rustle_db) * stroke
    push = uniform_filter1d(grit(spiky_db=2, rate=110), size=15) * boost_factor(3.6 * lumps)
    rattle = unit(vice(push, TILT_DB * np.tanh(wobble(14))))
    swish = patchy(grit(spiky_db=1.0, rate=140) * boost_factor(2.2 * lumps), patch_db=2.5)
    rustle = patchy(grit(spiky_db=2.5, rate=180) * boost_factor(2.6 * lumps), patch_db=3.0)
    gloves = swish_gain * coloured(swish, SWISH_COLOUR) + rustle_gain * coloured(rustle, RUSTLE_COLOUR)
    return boost_factor(rattle_db - 2.5) * gripped(rattle) + gloves


# time in seconds, peak in dB, t60 in seconds.
STEEL_TICKS = [(5.3316, -9, 0.032), (5.452, -48, 0.05), (5.4944, -46, 0.05), (5.5468, -46, 0.05),
               (5.6635, -6, 0.05), (5.7892, -35, 0.095), (6.4817, -12, 0.034), (6.789, -34, 0.038),
               (7.23, -43, 0.05), (7.7303, -25, 0.056), (7.8994, -33, 0.056)]


def ticks():
    out, t = np.zeros(N + SR), np.arange(SR // 5) / SR
    for s, db, t60 in STEEL_TICKS:
        out[round(s * SR):][:len(t)] += boost_factor(db - 10.0) * fade(t, t60, 0.0013) * rng.standard_normal(len(t))
    return bandpassed(out, 8200, 15100)


def scene():
    mono = yard() + drill() + fan() + fan() + knocks() + squeaks() + brake() + hands() + ticks()
    return np.array([mono, mono])


def band_limit(x):
    return signal.sosfilt(signal.butter(12, 15590, fs=SR, output="sos"), x)


def record(dry):
    split_hz, top_hz, band_hz = 8270, 15160, 689
    held = dry[0] / (1 + np.abs(dry[0] / .68) ** 4) ** (1 / 4)
    hz, _, mid = signal.stft(held, SR, nperseg=1024, noverlap=768)
    band = np.maximum((hz - split_hz) // band_hz + 1, 0).astype(int)
    block = np.arange(mid.shape[1]) // 4
    dice = rng.random((band.max() + 1, block.max() + 2))
    dice = np.where(rng.random(dice.shape) < .4, np.roll(dice, 1, axis=1), dice)
    dice = dice[band][:, block]
    dice[band == 0] = 1
    strength = np.sqrt(np.abs(uniform_filter1d(np.abs(mid) ** 2, size=15, axis=0)))
    noise = signal.stft(rng.standard_normal(N), SR, nperseg=1024, noverlap=768)[2]
    side = boost_factor(.3) * strength * noise / np.std(noise) * (dice < .36)
    mid = mid * (dice > .12)
    keep = (hz < top_hz)[:, None]
    mid, side = (signal.istft(z * keep, SR, nperseg=1024, noverlap=768)[1][:N] for z in (mid, side))
    return band_limit(np.array([mid + side, mid - side]))


dry = scene()
out = record(dry)
unload_audio(out)
```